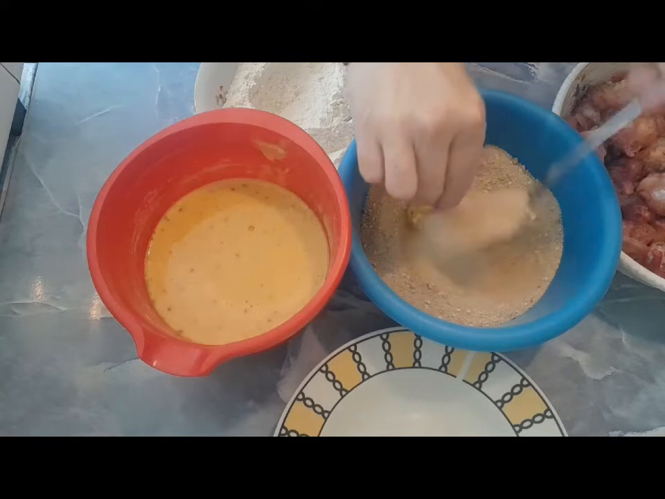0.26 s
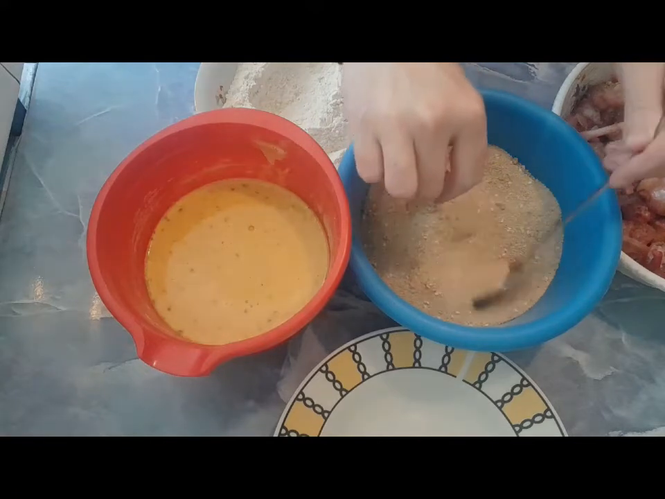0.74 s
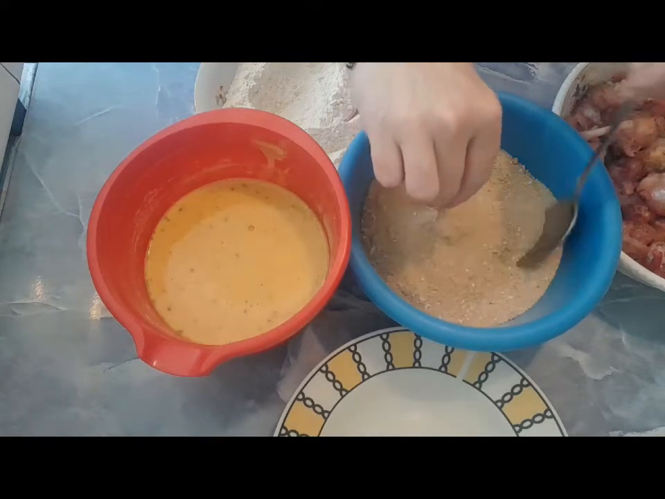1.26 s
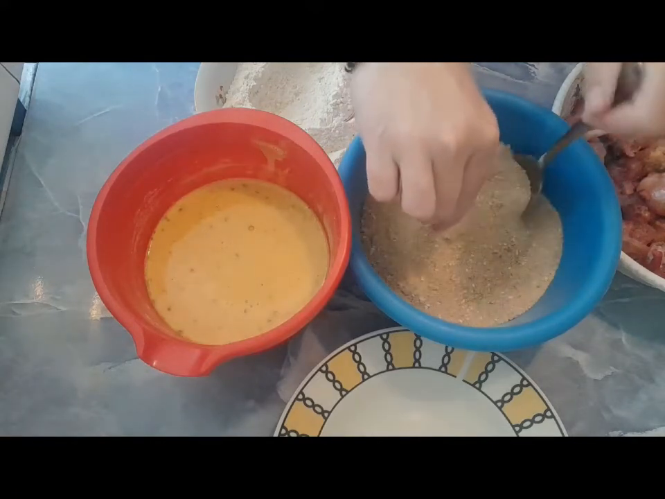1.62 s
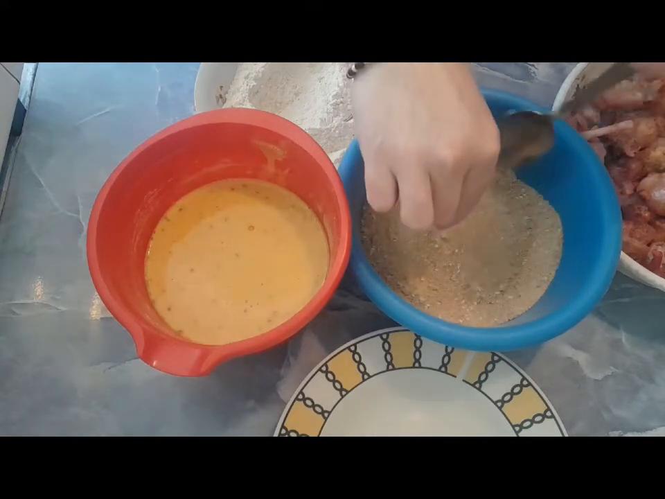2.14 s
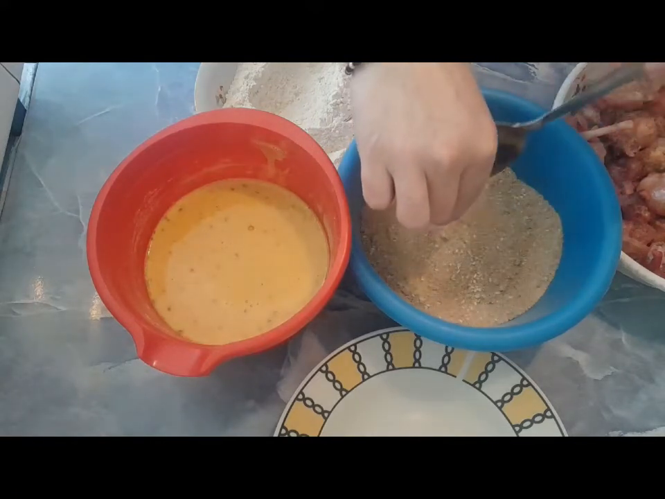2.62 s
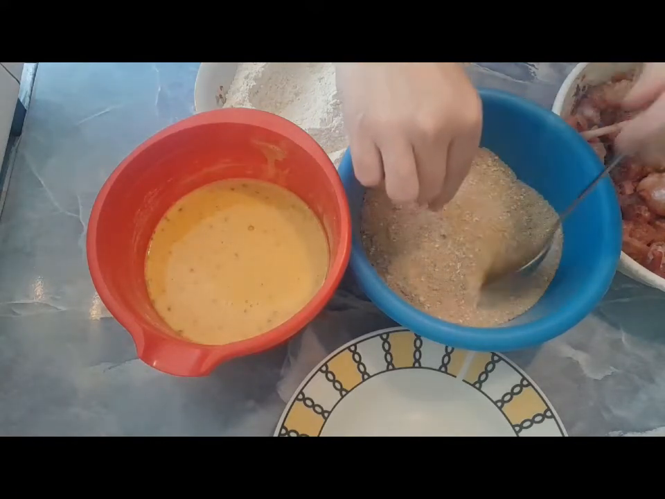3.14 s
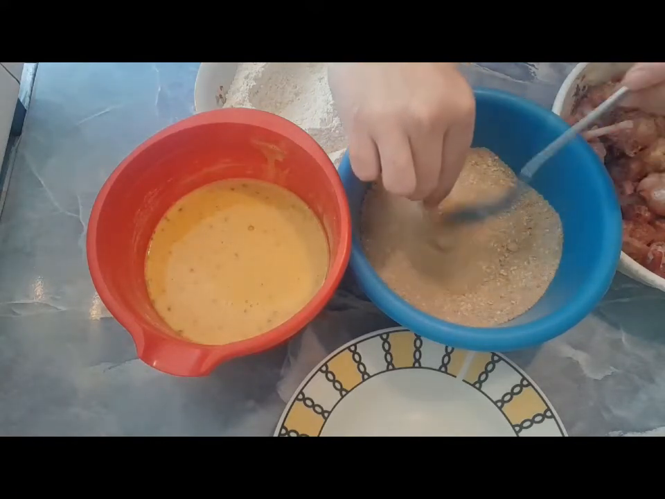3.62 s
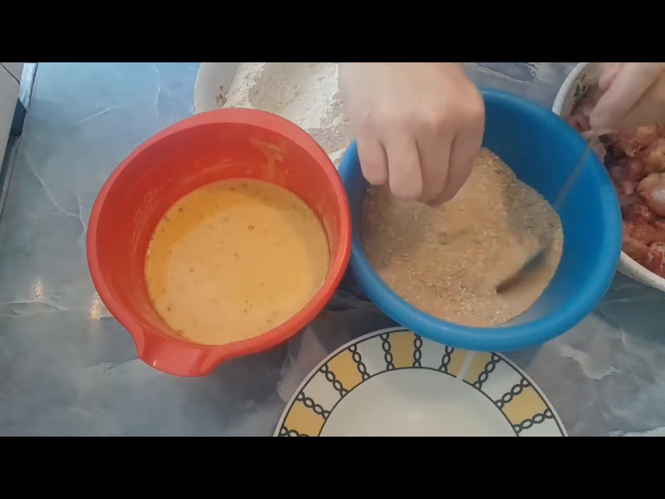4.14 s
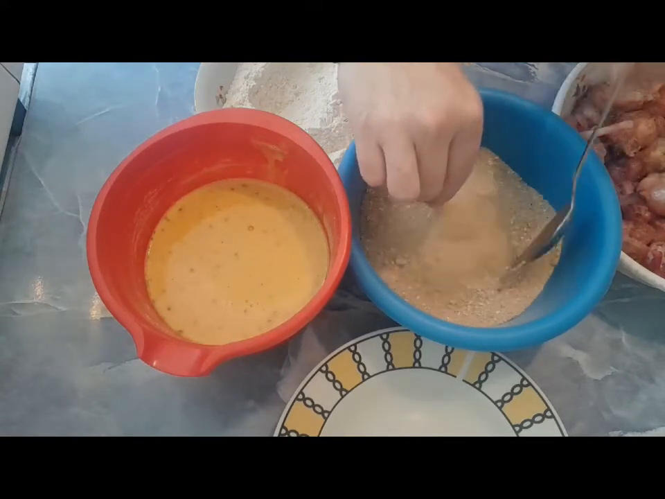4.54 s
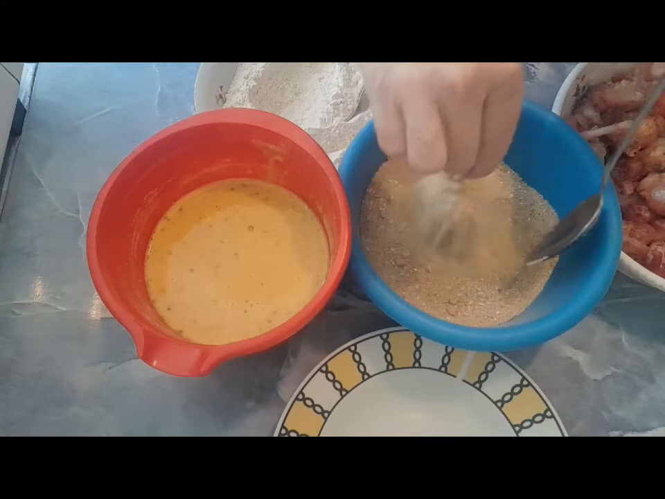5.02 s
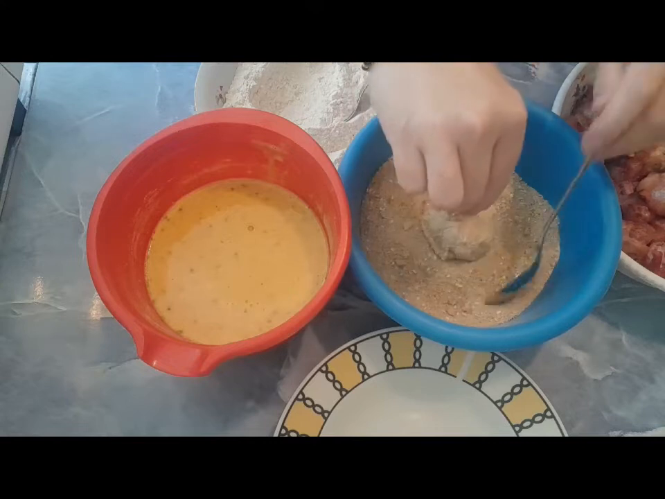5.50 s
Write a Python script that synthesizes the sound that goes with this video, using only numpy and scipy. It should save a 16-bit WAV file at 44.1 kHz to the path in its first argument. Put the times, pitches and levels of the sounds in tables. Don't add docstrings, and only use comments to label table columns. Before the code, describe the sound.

Dry crumbs crunch and hiss in uneven bursts as a spoon scoops and knocks a plastic bowl on a table. The first blow is loudest; gentler strokes and slides follow, with near-quiet gaps where a hand rustles the crumbs. Bright steel glints and tiny grit ticks appear. Close two-microphone pickup, short room reflections, faint hiss and appliance rumble.

```python
import sys
import numpy as np
from scipy import signal
from scipy.fft import rfft, irfft, next_fast_len
from scipy.io import wavfile
from scipy.ndimage import uniform_filter1d

SR = 44100
rng = np.random.default_rng(int(sys.argv[2]) if len(sys.argv) > 2 else 0)


def master_out(mix):
    frames = np.transpose(np.atleast_2d(mix))
    ceiling = np.clip(frames, -1, 1)
    pcm = np.round(ceiling * 32767).astype(np.int16)
    wavfile.write(sys.argv[1], SR, pcm)


def invert_db(level):
    return 10 ** (np.asarray(level, dtype=float) / 20)


N = 254456
TIME = np.arange(N) / SR

# (bite [s], peak [s], bite level [dB], peak level [dB], release [dB per s])
DIGS = [(-.05, 0.002, -50, -48.5, 203), (.043, .047, -36.5, -43.5, 343), (.596, .692, -63.5, -51, 260),
        (.988, .995, -64, -72, 160), (1.161, 1.165, -67, -57.5, 600), (2.186, 2.242, -57.5, -44, 200),
        (3.097, 3.115, -71.5, -69, 52), (3.15, 3.252, -68, -45, 216), (3.757, 3.78, -78, -68, 308),
        (4.034, 4.11, -54, -56.5, 117), (4.12, 4.164, -57.5, -48, 344), (4.589, 4.657, -57, -50.5, 300),
        (5.39, 5.466, -58, -41, 252)]
# (peak [s], peak level [dB], swell [s], release [dB per s])
SLIDES = [(.438, -68.5, 0.26, 152), (.8, -75.5, 0.072, 44), (1.2, -64.5, 0.038, 36),
          (1.357, -55, 0.082, 100), (1.523, -50.5, 0.23, 141), (1.887, -67.5, .2, 140),
          (2.0, -86, 0.037, 36), (2.411, -61, 0.24, 112), (2.81, -79, 0.087, 152), (3.455, -66, 0.19, 71),
          (4.45, -72, 0.22, 150), (4.944, -77, 0.26, 146), (5.278, -82.5, 0.11, 63),
          (5.688, -69.5, 0.2, 112)]
# (pitch [Hz], width [Hz], level [dB])
BOWL = [(54.7, 25, -28), (114.9, 12, -3), (159.1, 22.3, 2.5), (209.5, 18, -2), (253.6, 23, -7.5),
        (320, 27, -12)]
# (pitch [Hz], width [Hz], level [dB])
WALL = [(554, 37, 2), (806, 97, 3), (932, 50, -12.5), (1300, 54, -1), (1562, 98, 8.5), (1780, 76, 1.5),
        (2270, 240, -18), (2850, 64, -1), (3470, 46, 3.5), (4720, 340, 4), (5100, 200, 0)]


def level(x, db):
    return x * invert_db(db) / np.sqrt(np.mean(x ** 2))


def colour(x, points, share=1):
    hz, db = np.transpose(points)
    size = next_fast_len(N + 4096)
    f = np.log(np.fft.rfftfreq(size, 1 / SR) + 1)
    gain = invert_db(share * np.interp(f, np.log(hz), db))
    return irfft(rfft(x, size) * gain, size)[..., :N]


def ring(x, modes):
    return sum(invert_db(db) * signal.lfilter(*signal.iirpeak(hz, hz / width, SR), x) for hz, width, db in modes)


def ring_on(x, drive_db, modes):
    return ring(x * invert_db(drive_db), modes) / np.std(ring(x, modes))


def walk(rate):
    k = int(SR / rate)
    held = np.repeat(rng.standard_normal(N // k + 1), k)
    return 0.96 * uniform_filter1d(uniform_filter1d(held, k), k)[:N]


def cracks(rate, spread_db, patchy_db, alike):
    hit = rng.random(N) < rate / SR
    size = invert_db(spread_db * rng.exponential(size=N) + patchy_db * walk(40))
    mid, side = rng.standard_normal((2, N))
    opposite = np.array([[1], [-1]])
    return level(hit * size * (np.sqrt(1 + alike) * mid + np.sqrt(1 - alike) * side * opposite), 0)


def pockets(x, depth_db, wide=5, long=6):
    z = signal.stft(x, nperseg=512)[2]
    field = uniform_filter1d(rng.standard_normal(z.shape[1:]), wide, axis=0)
    field = uniform_filter1d(field, long, axis=1)
    patchy = z * invert_db(depth_db * field / field.std())
    return level(signal.istft(patchy, nperseg=512)[1][:, :N], 0)


def effort(above_db, rise, fall, hand_db=-60, lead_s=0):
    # (time [s], effort [dB])
    hand = [(0, -56), (.24, -75), (.44, -65), (.56, -68.5), (.8, -68.5), (1.0, -71), (1.15, -74),
            (1.75, -71), (1.9, -72.5), (2.15, -86), (2.75, -74.5), (3.05, -76.5), (3.7, -64.5),
            (4.0, -65.5), (4.5, -68.5), (4.85, -68), (5.08, -89), (5.77, -72.5)]
    t = TIME[::32]
    peak, db, swell, release = np.transpose(SLIDES)
    slides = np.transpose([peak - swell, peak, db - 11.5, db, release])
    rows = np.concatenate([DIGS, slides])
    bite, peak, bite_db, db, release = rows.T[:, :, None]
    rise = np.where(np.arange(len(rows)) < len(DIGS), rise, fall)[:, None]
    swell_db = (bite_db - db) * np.clip((peak - t) / np.maximum(peak - bite, .001), 0, 1)
    shape_db = rise * swell_db - fall * release * np.maximum(t - peak, 0)
    tap = peak - bite < .01
    start_db_per_s = np.where(tap, 4000, 1400)
    shape_db = shape_db - start_db_per_s * np.maximum(bite - lead_s * ~tap - t, 0)
    each_db = np.maximum(db + above_db[:, None] + shape_db, -160)
    power = np.sum(invert_db(each_db) ** 2, axis=0)
    power = power + invert_db(np.interp(t, *np.transpose(hand)) + hand_db) ** 2
    return np.interp(TIME, t, 10 * np.log10(power))


def contact():
    # (fine hiss [dB], wall rub [dB], bowl boom [dB],
    # spoon song [dB], low spoon modes above the song [dB])
    dig_shakes = [(-4.5, 6.5, 12, -22, 12), (-9, 3, 8, -24, -2), (-4.5, 3.5, 5.5, -11, 7),
                  (-11, 2, 9, -10, 17), (-7, 3.5, 15, 2.5, -7), (-7, -9, 2.5, -8, 6), (5, 1, 16.5, 10, 4),
                  (-5.5, -2.5, 7.5, -20, 9.5), (4, 7, 6, 15.5, -1.5), (0, -1.5, 4.5, -6.5, 6),
                  (-5.5, 1.5, 9.5, -26, 11), (-6, 4.5, 4.5, -11.5, 6.5), (-3.5, -3, 9, -16, 13.5)]
    # (steel edge [dB], wall rub [dB], bowl boom [dB])
    drag = [(0, 0.5, 7.5), (6.5, 5, 12), (1, 4.5, 13.5), (-10, -3.5, 2), (-5.5, -7, 5), (7, 2.5, -4),
            (8, 0, 0), (0, -6.5, -11), (5.5, 5, -6), (-1, -6, 9), (-1.5, 0.5, 0), (-3, 3, 6), (1, -2, 19.5),
            (4.5, -13, 0)]
    steel, rub_db, boom_db = np.transpose(drag)
    sliding = [steel, rub_db, boom_db, steel - 5.5, np.full(len(drag), 8)]
    return np.concatenate([np.transpose(dig_shakes), sliding], axis=1)


def crunch():
    # (pitch [Hz], level [dB per Hz])
    crunch_colour = [(940, -5.5), (1600, -1.5), (2240, -4.5), (3120, -1), (3700, -6), (4760, -4.5),
                     (6130, -9), (6770, -10.5), (8600, -4.5), (11200, -43), (18900, -120)]
    coarse = pockets(cracks(9000, spread_db=1.5, patchy_db=0.8, alike=0), depth_db=3.0)
    even = np.zeros(len(DIGS + SLIDES))
    return level(colour(coarse, crunch_colour), 0) * invert_db(effort(even, rise=0.93, fall=0.98, hand_db=-28))


def hiss(fine, hiss_db, lead_s):
    # (pitch [Hz], level [dB per Hz])
    hiss_colour = [(5060, -33), (8600, -13), (9280, -3.5), (9660, -1.5), (10100, -4.5), (11100, -4),
                   (13900, -3), (14600, -10), (15500, -28)]
    bright = level(colour(pockets(fine, depth_db=3.5, wide=13), hiss_colour), -3.95)
    return bright * invert_db(effort(hiss_db, rise=0.76, fall=0.82, hand_db=-12.5, lead_s=lead_s))


def song(fine, song_db, low_db, lead_s):
    # (pitch [Hz], width [Hz], level [dB])
    spoon = [(3620, 180, -18), (5246, 260, -12), (6520, 46, -12), (9800, 34, -8), (10080, 40, 2.5),
             (11390, 59, -19), (13000, 110, -10.5), (14300, 150, -10)]
    song_at = effort(song_db, rise=0.041, fall=1.0, hand_db=-21.5, lead_s=lead_s) + 17
    low_at = effort(song_db + low_db, rise=0.14, fall=0.95, hand_db=-11) + 17
    drive_db = [low_at] * 3 + [song_at] * 2 + [song_at + 2.5] * 3
    return sum(ring(fine * invert_db(db + 6.1 * walk(9)), [mode]) for db, mode in zip(drive_db, spoon))


def rub(rub_db):
    # (pitch [Hz], level [dB per Hz])
    rub_colour = [(190, -42), (330, -3.5), (427, -15.5), (517, 5), (702, -4), (939, 1.5), (1080, -2),
                  (2400, -18), (3120, -55), (5280, -120)]
    push = cracks(5000, spread_db=1.5, patchy_db=3.0, alike=0.27)
    direct = level(colour(push, rub_colour), -4.0)
    ringing = level(colour(ring(push, WALL), rub_colour, share=0.96), -9.5)
    return invert_db(effort(rub_db, rise=0.79, fall=0.73, hand_db=-0.5)) * (direct + ringing)


def boom(boom_db):
    shove = cracks(5000, spread_db=2.5, patchy_db=3.0, alike=0.95)
    boom_at = effort(boom_db, rise=1.32, fall=0.6, hand_db=8)
    return colour(ring_on(shove, boom_at - 1.5, BOWL), [(340, -2.5), (450, -17.0), (900, -21)])


def stirring():
    hiss_db, rub_db, boom_db, song_db, low_db = contact()
    fine = cracks(14000, spread_db=1.46, patchy_db=1.8, alike=0)
    lead_s = 0.0043
    crumbs = crunch() + hiss(fine, hiss_db, lead_s)
    return crumbs + song(fine, song_db, low_db, lead_s) + rub(rub_db) + boom(boom_db)


def house():
    # (pitch [Hz], level [dB per Hz])
    rumble_colour = [(15, -58.5), (25, -36), (43, -9), (80, -16.5), (151, -4.5), (430, -30), (473, -34),
                     (573, -24), (643, -31), (1350, -32), (1610, -25), (2400, -70), (3120, -80.5),
                     (5280, -120)]
    # (pitch [Hz], width [Hz], level [dB])
    room_modes = [(58.7, 6.4, -13), (145, 100, -2), (247, 11, -2), (332, 14, -14), (498, 8.3, -16),
                  (566, 25, -12), (950, 40, -5)]
    mid, side = rng.standard_normal((2, N))
    side = colour(side, [(60, -13.0), (250, -4.5), (800, -1.5), (16000, 20)])
    air = np.array([mid + side, mid - side])
    hum = level(sum(ring(air, [mode]) * invert_db(2.7 * walk(5.7)) for mode in room_modes), -1.5)
    hum = colour(hum, [(1700, -1), (2200, -31.0)])
    rumble = level(colour(air, rumble_colour), 3.7) * invert_db(0.41 * walk(3.7))
    return level(rumble + hum, -65)


def whine():
    # (time [s], level [dB])
    band_level = [(0, -80), (.7, -74), (1.1, -96), (2.3, -75), (3.6, -101), (4.7, -84), (5.35, -76.5),
                  (5.77, -78)]
    even = np.zeros(len(DIGS + SLIDES))
    shake = uniform_filter1d(invert_db(effort(even, rise=0.34, fall=0.43)), size=6000)
    loudness = invert_db(np.interp(TIME, *np.transpose(band_level))) + invert_db(-24) * shake
    turn = 2 * np.pi * np.cumsum(1597 + 8 * walk(2.5)) / SR
    tone = [walk(15) * np.sin(turn) + walk(21.92) * np.cos(turn) for _ in "LR"]
    return loudness * np.array(tone)


def fade(t, hz, width):
    return np.exp(-np.pi * width * t) * np.sin(2 * np.pi * hz * t)


def knocks():
    # (time [s], blow [dB], table thud above blow [dB],
    # bowl thud above blow [dB], best excited wall pitch [Hz])
    blows = [(0.043, -15.5, -19, -24, 1350), (0.621, -37.5, -24, 0, 550), (0.687, -36.5, -17, -1.5, 516),
             (1.162, -37.5, -7.5, -0.5, 580), (2.244, -40, -3.5, 1.5, 1570), (3.248, -20.5, -31, -4.5, 535),
             (4.032, -41.5, -16, 3, 540), (4.157, -31.5, -0.5, -17, 1030), (4.589, -43, -4.5, -1, 796),
             (4.647, -37.5, -8, -17, 900), (5.392, -41, -4, 7.5, 560), (5.455, -24.5, -4.5, 2.5, 1780)]
    out, t = np.zeros((2, N + SR)), np.arange(SR // 3) / SR
    hz, width, db = np.transpose(WALL)[:, :, None]
    chance = rng.standard_normal((len(blows), 4, len(WALL), 1))
    for (s, blow_db, table_db, bowl_db, best_hz), (gain, detune, left, right) in zip(blows, chance):
        hard_db = -21.5 - 0.4657 * blow_db
        mode_db = db + hard_db * (hz > 2000) - 12.0
        share_db = 1.4 * gain + np.maximum(-30 * abs(np.log2(hz / best_hz)), mode_db)
        turn = np.array([left, right]) * np.clip(hz / 2500, 0, 2)
        tone = np.sin(2 * np.pi * hz * (1 + 0.005 * detune) * t + turn)
        wall = invert_db(share_db) * np.exp(-1.3 * np.pi * width * t) * tone
        wall = 1.28 * (wall * (1 - np.exp(-t * hz / 1.93))).sum(axis=1)
        bowl = sum(invert_db(0.6 * b) * fade(t, f, w * 0.73) for f, w, b in BOWL[2:5])
        bowl = 0.5 * invert_db(bowl_db) * bowl * (1 - np.exp(-t / 0.0051))
        table = 1.12 * invert_db(table_db) * fade(t, BOWL[1][0], 6.9) * (1 - np.exp(-t / 0.0045))
        legs = invert_db(-23.0) * fade(t, BOWL[0][0], 8.3) * (1 - np.exp(-t / .02))
        i = int(s * SR)
        out[:, i:i + len(t)] += invert_db(blow_db) * (0.57 * wall + bowl + table + legs)
    return out[:, :N]


def ticks():
    # (time [s], peak level [dB], pitch [Hz], decay [s])
    wall_ticks = [(0.0439, -32, 2190, 0.0041), (0.6715, -49, 4720, 0.003), (0.88, -63, 5360, 0.0027),
                  (0.9895, -54.5, 3170, 0.0017), (1.1618, -42.5, 3050, 0.0015),
                  (1.358, -47.5, 2270, 0.0051), (1.7892, -58.5, 3000, 0.003), (2.186, -45.5, 3070, 0.0049),
                  (2.2385, -55, 3220, 0.0035), (2.411, -50.5, 4840, 0.0046), (3.2445, -41.5, 3660, 0.0044),
                  (3.4487, -61, 6250, 0.0033), (4.0432, -40, 2320, 0.0015), (4.3271, -70, 5100, 0.0025),
                  (4.648, -47, 3440, 0.0036), (5.3924, -49, 4570, 0.0041), (5.4582, -42, 3520, 0.0036)]
    # (time [s], peak level [dB], pitch [Hz], decay [s])
    steel_glints = [(1.1644, -62, 9800, 0.004), (1.8415, -54, 10100, 0.004), (2.1874, -51, 10000, 0.0037),
                    (2.2137, -38.5, 10210, 0.0045), (3.0935, -49.5, 10400, 0.005),
                    (3.747, -48, 9800, 0.0032), (3.7718, -55, 10300, 0.0037), (4.031, -49, 9800, 0.0046),
                    (4.5874, -47, 13600, 0.0045), (5.4603, -31, 9940, 0.0028), (5.679, -53, 13000, 0.02)]
    events = wall_ticks + steel_glints
    out, t = np.zeros((2, N + SR)), np.arange(SR // 8) / SR
    grit = rng.standard_normal((len(events), 2, len(t)))
    for (s, db, hz, decay), noise in zip(events, grit):
        i = int(s * SR)
        burst = noise * (np.exp(-t / decay) + 0.29 * np.exp(-t / 0.025))
        width, gain_db = (140, 12) if hz > 8000 else (700, 9)
        out[:, i:i + len(t)] += invert_db(db) * ring(burst, [(hz, width, gain_db), (hz, 4000, -10)])
    return out[:, :N]


def kitchen(x, tail_db=-13, t60_s=0.33):
    t = np.arange(SR // 2) / SR
    envelope = invert_db(-60 * t / t60_s) * (1 - np.exp(-t / 0.0084))
    tail = rng.standard_normal((2, len(t))) * envelope / np.sqrt(t60_s * SR / 14)
    wet = signal.fftconvolve(x, tail, axes=1)[:, :N]
    return x + invert_db(tail_db) * colour(wet, [(80, -15), (500, 6), (3000, 2.5), (12000, 0)])


def scene():
    # (pitch [Hz], level [dB])
    table_top = [(30, -24), (55, -1), (82, -6.5), (102, -0.5)]
    on_table = colour(stirring() + knocks(), table_top)
    return kitchen(on_table + ticks()) + house() + whine()


def low_pass(x):
    return signal.sosfilt(signal.butter(12, 15660, fs=SR, output="sos"), x)


def record(dry):
    # (pitch [Hz], level [dB per Hz])
    self_noise = [(1120, -24), (1900, -8), (2260, -15), (2410, -9), (2900, -7.5), (3130, -11),
                  (5900, -13.5), (9570, -11.5), (12100, -14), (15500, -9.5)]
    # (pitch [Hz], left minus right [dB])
    port_tilt = [(60, -2), (380, -1.3), (1290, -1.5), (2380, -7), (4400, -9.5), (8120, 3.5), (15000, 3)]
    # (pitch [Hz], level [dB])
    notch = [(6900, 0), (7300, -8), (7900, -5), (8300, -11), (8600, -26), (8850, -22), (9150, 0),
             (14500, 0), (15100, -11), (15600, -35)]
    dry = dry + level(colour(rng.standard_normal((2, N)), self_noise), -79)
    left = colour(dry[0], port_tilt, share=0.69)
    right = colour(dry[1], port_tilt, share=-0.32)
    mix = colour(np.array([left, right]), notch)
    return low_pass(mix)


dry = scene()
out = record(dry)
master_out(out)
```